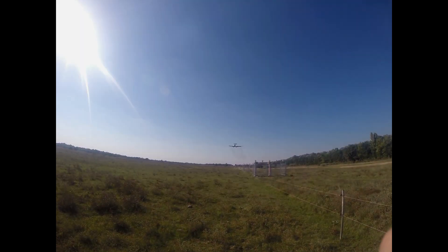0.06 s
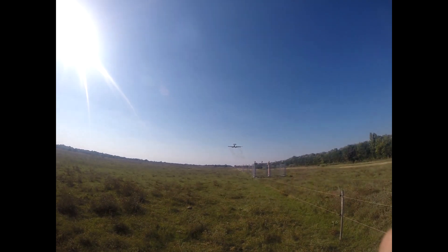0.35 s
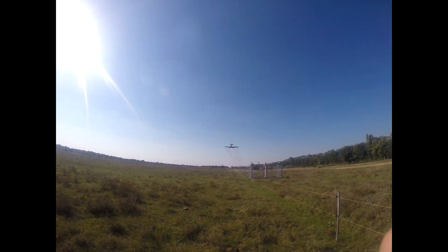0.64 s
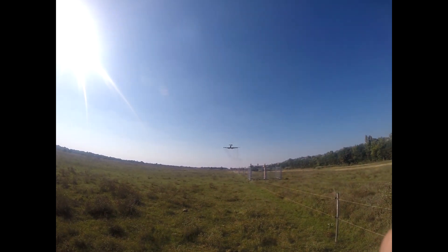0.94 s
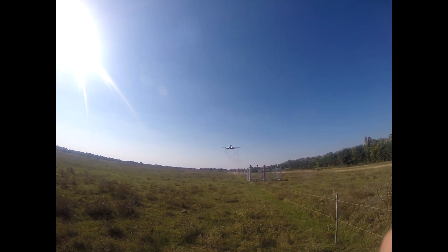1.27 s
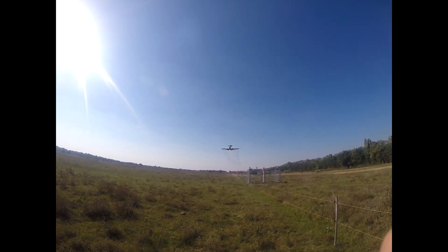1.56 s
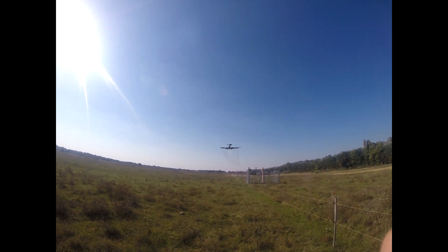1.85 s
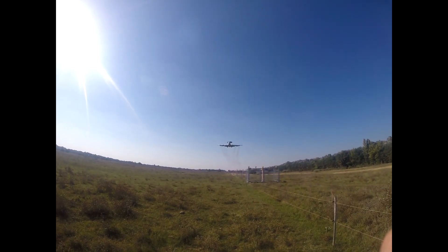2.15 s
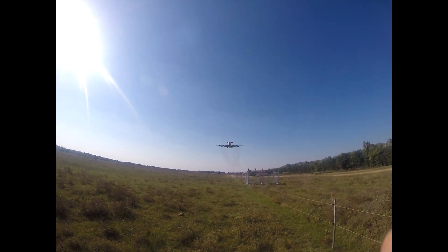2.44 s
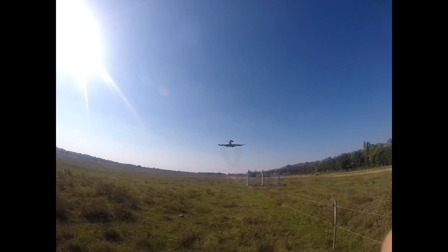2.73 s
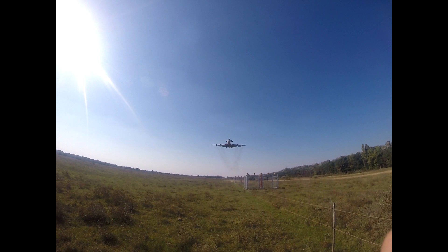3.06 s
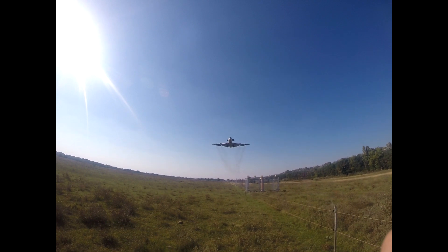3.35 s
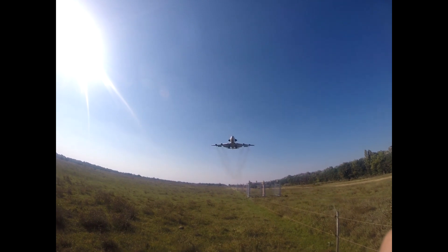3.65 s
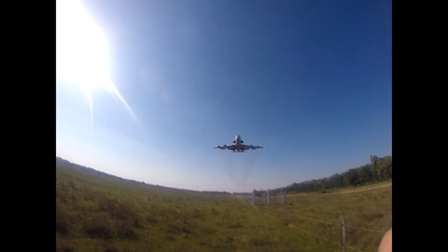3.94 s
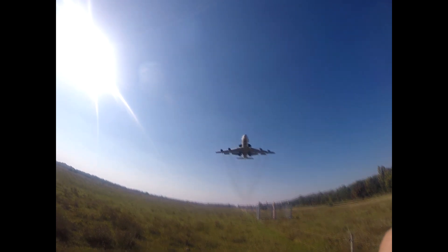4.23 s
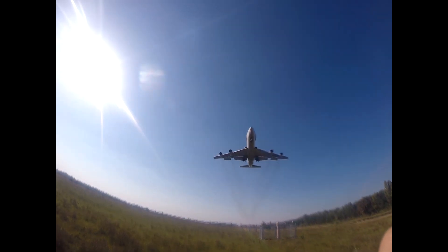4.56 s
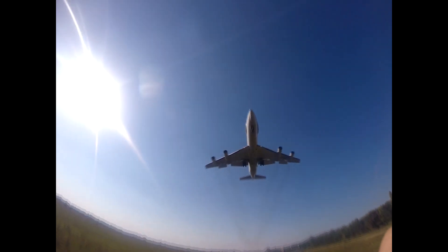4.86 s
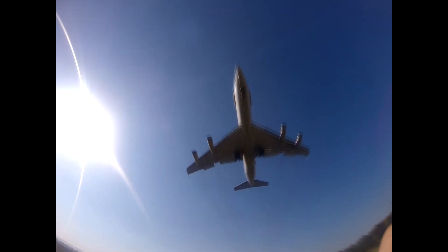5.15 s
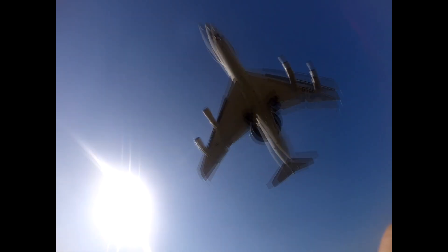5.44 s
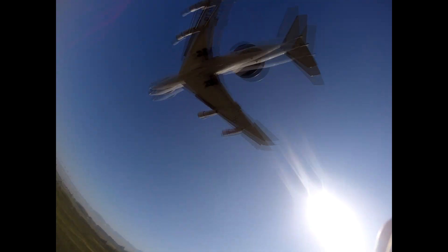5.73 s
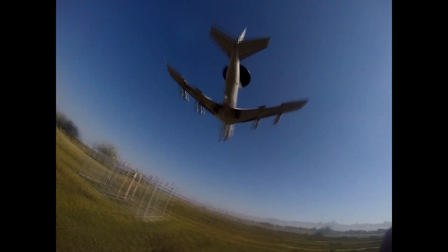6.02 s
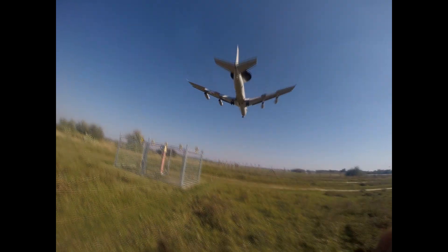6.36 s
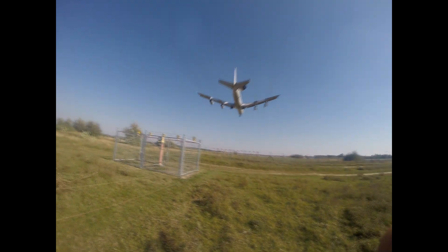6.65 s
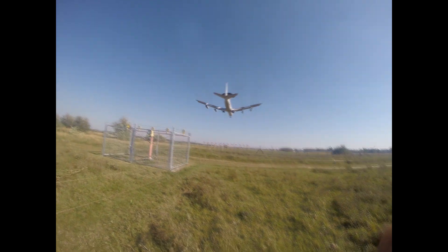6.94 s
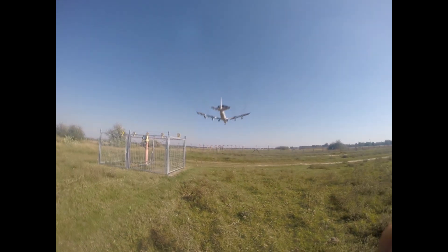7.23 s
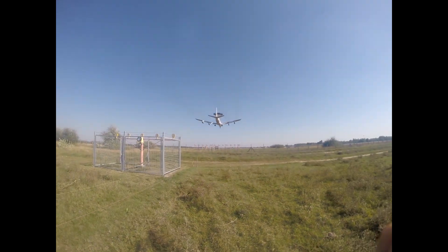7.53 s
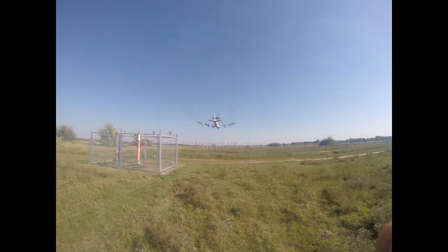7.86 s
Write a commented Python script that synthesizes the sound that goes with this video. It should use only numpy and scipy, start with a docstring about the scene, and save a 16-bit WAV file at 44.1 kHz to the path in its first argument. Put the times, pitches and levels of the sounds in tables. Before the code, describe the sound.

A large four-engined jet approaches low over an open grass field. For the first two seconds it is distant, a faint, dull rush with a thin high whine. From about 2.5 seconds a piercing fan whistle stands out, flaring unevenly between 3 and 5 seconds, while the rush grows louder and brighter. At about 5.5 seconds the jet passes directly overhead, the loudest moment: a broad, sweeping roar and hiss, with the whining tones sliding quickly down in pitch. A hand bumps the microphone with two dull thumps around 5.5 seconds, and two lighter knocks follow near 6.3 and 6.6 seconds. From 6 seconds to the end, near 8 seconds, the jet recedes: the hiss softens, and a lower turbine whine, exhaust roar and deep rumble carry on as it moves away.

```python
"""A four-engined jet on approach passes low over a hand-held camera in a grass field.
First come intake noise and fan whistles, beamed forward and dulled by air absorption while far away.
As the jet passes, the Doppler shift slides the tones down, interference with the ground echo sweeps the
roar, and the hand bumps the camera case, whose resonances colour everything. Last, the rear fan hiss,
turbine whine and exhaust roar recede over a faint background."""
import sys
import numpy as np
from scipy import signal
from scipy.fft import rfft, irfft, next_fast_len
from scipy.io import wavfile
from scipy.ndimage import uniform_filter1d

SR = 44100
rng = np.random.default_rng(int(sys.argv[2]) if len(sys.argv) > 2 else 0)


def transcribe(signal):
    """Save signal, clipped to [-1, 1], as a 16-bit WAV file at the path in sys.argv[1]."""
    frames = np.atleast_2d(signal).T
    limited = np.clip(frames, -1, 1)
    pcm = np.round(limited * 32767).astype(np.int16)
    wavfile.write(sys.argv[1], SR, pcm)


N = 347949
TIME = np.arange(N) / SR
SLOW_TIME = np.linspace(0, TIME[-1], 8192)
SPEED_M_S, HEIGHT_M, SOUND_M_S = 73.8, 30.2, 343  # a straight, level pass
MACH = SPEED_M_S / SOUND_M_S
OVERHEAD_S = 5.64  # the sound arrives from straight above


# intake spectrum: (frequency [Hz], level [dB])
INTAKE_SPECTRUM = [(500, -36.5), (1000, -15.5), (1300, -13.5), (1700, -6), (2600, -3.5), (3600, 0.5),
                   (5000, -10), (6200, -16.5), (8000, -24), (10000, -23.5), (11500, -54), (15000, -62)]
# directivity, as in every BEAMS table:
# (start [deg from nose], end [deg], level at start [dB], slope [dB/deg], opening steepness [exponent])
INTAKE_BEAMS = [(1.42, 94, -56, -0.34, 4.7), (160.4, 177, -79.5, 0.23, 7.2)]
def intake_noise():
    """Directivity: broadband intake noise radiates mainly forward, so it leads the jet."""
    rush = noise(lambda hz, t: spectrum(INTAKE_SPECTRUM, hz) + howl_db(hz, t)
                 + heard_db(INTAKE_BEAMS, hz, t))
    return rush * flutter(db=.76, rate_hz=8.7)


def howl_db(hz, t, near_hz=960, octave_m=438, width_hz=120):
    """A narrow spectral peak gives noise a hollow pitch; it sinks and grows as the jet nears."""
    distance, _ = flight(t)
    centre_hz = near_hz * 2 ** (distance / octave_m)
    height_db = 3 + 11.5 * np.exp(-distance / 67)
    return height_db * bell(hz, centre_hz, width_hz)


# exhaust spectrum: (frequency [Hz], level [dB])
EXHAUST_SPECTRUM = [(30, -16), (70, 0), (130, -6.5), (220, -2), (370, -6.5), (520, -15), (800, -14),
                    (1300, -3), (3000, -30)]
EXHAUST_BEAMS = [(1.5, 6, -86.5, 1, 6), (5.5, 97, -74, -0.1483, 5.5), (119, 177, -89, 0.1147, 7.9)]
def exhaust_roar():
    """Turbulence in the exhaust radiates a broad, low roar."""
    roar = noise(lambda hz, t: spectrum(EXHAUST_SPECTRUM, hz) + heard_db(EXHAUST_BEAMS, hz, t))
    return roar * flutter(db=1.53, rate_hz=16)


# rear fan spectrum at a blade tone of rest_hz: (frequency [Hz], level [dB])
REAR_FAN_SPECTRUM = [(700, -29.5), (1200, -19), (1700, -17.5), (2300, -18), (2600, -3), (2850, 0.5),
                     (3200, -9.5), (3700, -12.5), (4600, -13), (6000, -19.5), (8500, -22.5), (11000, -31),
                     (15000, -49.5)]
REAR_FAN_BEAMS = [(12.64, 71, -58.5, -0.36, 11), (60, 177, -75.5, 0.048, 6)]
def rear_fan_hiss(rest_hz=2800):
    """The Doppler shift moves noise too: the hump of this hiss follows the blade tone."""
    hiss = noise(lambda hz, t: spectrum(REAR_FAN_SPECTRUM, hz * rest_hz / blade_tone_hz(t))
                 + heard_db(REAR_FAN_BEAMS, hz, t))
    return hiss * flutter(db=1, rate_hz=22)


# partials, as in every TONES table: (frequency [x blade tone], relative level [dB], line width [Hz])
WHISTLE_TONES = [(1, 0, 5), (2, -21, 10), (3, -27, 14)]
# speed of the loudest fan against the others: (time [s], speed [ratio])
WHISTLE_SPEED = [(1.8, .921), (2.5, .986), (3.0, 1), (5.15, 1.002), (5.3, 1.015), (5.5, 1.021),
                 (5.75, 1.008)]
# flares and a dip of its whistle: (time [s], duration [s], level [dB])
WHISTLE_FLARES = [(3.1, 0.088, 9.5), (3.36, 0.16, 7.5), (3.85, 0.39, 6), (4.29, 0.25, 12.5),
                  (4.57, 0.31, 13.5), (4.8, 0.049, 9), (4.91, 0.081, -4), (5.06, 0.1, 5), (5.46, 0.11, 10)]
WHISTLE_BEAMS = [(5.2, 73.6, -30, -0.17, 8)]
def fan_whistle():
    """Periodic blade passage: the loudest fan beams a harmonic series forward."""
    blade_hz = blade_tone_hz(SLOW_TIME) * curve(WHISTLE_SPEED, SLOW_TIME)
    level_db = beamed_db(WHISTLE_BEAMS, SLOW_TIME) + swell_db(WHISTLE_FLARES, SLOW_TIME, order=4)
    return tones(WHISTLE_TONES, blade_hz, level_db, scatter=.22)


# partials and directivity of the intake (ahead), the duct (below) and the turbine (behind)
INTAKE_TONES = [(.312, 8, 9), (.398, 11, 6), (.586, 16, 7), (.85, 21, 6), (.912, 24, 5), (.968, 29, 5),
                (1.59, 9, 9), (1.7, 4, 9), (1.826, 13, 4), (1.885, 2, 6), (1.94, 4, 8), (2.055, 4, 5),
                (2.5, 1, 90), (2.916, -2, 8)]
INTAKE_TONE_BEAMS = [(6.7, 76, -57, -0.29, 4.4)]
DUCT_TONES = [(1, 0, 9), (1.02, -4, 9), (.893, -3, 10), (1.945, -10, 14), (2.02, -12, 14), (1.87, -10, 70),
              (3.0, -17, 260)]
DUCT_BEAMS = [(40, 138, -43, -0.083, 9), (139, 220, -55.5, 0.032, 9)]
TURBINE_TONES = [(.402, 1.2, 3.8), (.6, 5, 100), (1.68, 1, 25), (1.84, 18.2, 250)]
TURBINE_BEAMS = [(144.3, 177, -70.5, 0.35, 4.4)]
def engine_whine():
    """Rotor tones keep constant ratios to the blade tone; directivity brings each group in turn."""
    blade_hz = blade_tone_hz(SLOW_TIME)
    intake = tones(INTAKE_TONES, blade_hz, beamed_db(INTAKE_TONE_BEAMS, SLOW_TIME), scatter=.4)
    duct = tones(DUCT_TONES, blade_hz, beamed_db(DUCT_BEAMS, SLOW_TIME), scatter=.3)
    turbine = tones(TURBINE_TONES, blade_hz, beamed_db(TURBINE_BEAMS, SLOW_TIME), scatter=.35)
    return intake + duct + turbine


PLUME_BEAMS = [(159.4, 177, -72, -.35, 9.4)]
def plume_rumble(corner_hz=90):
    """Directivity: the plumes beam their deep rumble backward, so it comes once the jet has gone by."""
    return noise(lambda hz, t: beamed_db(PLUME_BEAMS, t) - 10 * np.log10(1 + (hz / corner_hz) ** 4))


# blade tone pitch, lifting slightly just before overhead: (time [s], frequency before Doppler [Hz])
BLADE_PITCH = [(2.5, 2743), (4.7, 2725), (5.15, 2791), (7.89, 2753)]
def blade_tone_hz(t):
    """Doppler effect: the blade tone is raised on approach and lowered in retreat."""
    _, angle = flight(t)
    return curve(BLADE_PITCH, t) / (1 - MACH * np.cos(angle))


def flight(t):
    """Retarded time: distance [m] and angle from the nose [rad] at which the sound heard at t left."""
    along = SPEED_M_S * (t - OVERHEAD_S) + MACH * HEIGHT_M
    contraction = 1 - MACH ** 2
    distance = (np.sqrt(along ** 2 + contraction * HEIGHT_M ** 2) - MACH * along) / contraction
    return distance, np.arccos(MACH - along / distance)


def beamed_db(beams, t, reference_m=100, closing=12):
    """Beams add in power as they sweep over the listener and fall off by spherical spreading."""
    distance, angle = flight(t)
    power = 0
    for start, end, db, slope, opening in beams:
        opens, closes = (np.tan(np.radians(np.clip(edge, 1, 179)) / 2) / np.tan(angle / 2)
                         for edge in (start, end))
        inside = 1 / ((1 + opens ** opening) * (1 + closes ** -closing))
        power = power + (inside * undb(db + slope * (np.degrees(angle) - start))) ** 2
    return 10 * np.log10(power) - 20 * np.log10(distance / reference_m)


def air_loss_db(hz, t, db_per_m=.1478, reference_m=38.4):
    """Atmospheric absorption grows with frequency and with the path beyond the reference distance."""
    distance, _ = flight(t)
    return db_per_m * (distance - reference_m) * (hz / 10000) ** 1.56


# swells and sags of the engine noise: (time [s], duration [s], level at swell_hz [dB])
SWELLS = [(.3, 0.51, 1.5), (1.15, 0.47, 1.5), (1.7, 0.83, -2.5), (2.75, 0.26, -1), (3.1, 0.37, 3),
          (3.88, 0.67, 4), (4.16, 0.39, -1.5), (4.31, 0.17, 2.5), (5.55, 0.28, 5.5), (5.78, 0.15, 0.5),
          (6.02, 0.27, 3), (7.15, 0.73, 2.5)]
def heard_db(beams, hz, t, swell_hz=2520):
    """Gains along a path add in decibels: beams, swells and patches, less the air's absorption."""
    swells = swell_db(SWELLS, t, order=2) * (hz / swell_hz) ** .24  # deeper in the treble
    return beamed_db(beams, t) + swells + patches_db(hz, t) - air_loss_db(hz, t)


def tones(lines, blade_hz, level_db, scatter):
    """Spectral broadening: each tone is a steady part plus a part scattered by turbulence."""
    turns = np.cumsum(audio_rate(blade_hz)) / SR
    total = 0
    for multiple, db, width in lines:
        share = scatter * np.sqrt(width / 10)  # the wider a line, the less of it stays steady
        field = (1 + share * (walk(width) + 1j * walk(width))) / np.sqrt(.5 + share ** 2)
        amplitude = np.abs(field) * undb(level_db + db - air_loss_db(multiple * blade_hz, SLOW_TIME))
        drift = audio_rate(np.unwrap(np.angle(field)))
        total = total + audio_rate(amplitude) * np.cos(2 * np.pi * multiple * turns + drift)
    return total


def flutter(db, rate_hz):
    """Scintillation: the gain wavers as the sound crosses uneven air."""
    return audio_rate(undb(db * walk(rate_hz)))


def patches_db(hz, t, depth_db=1.5, length_s=.29, width_hz=220):
    """Selective fading: uneven air lets narrow bands swell and fade on their own."""
    field = rng.standard_normal((len(hz), len(t)))
    for _ in range(2):
        field = uniform_filter1d(field, max(1, int(width_hz / hz[1, 0])), axis=0)
        field = uniform_filter1d(field, max(1, int(length_s / t[1])), axis=1)
    return depth_db * field / field.std()


def ground_echo(x, db=-4.5, soft_hz=900, give_rad=.83, overhead_lag_s=.0081):
    """Comb interference: soft ground returns the lows, latest overhead, so the notches sink and rise."""
    returned = filtered(x, lambda hz: undb(db) * np.exp(-hz / soft_hz
                                                        - 1j * give_rad * np.sqrt(hz / soft_hz)))
    _, angle = flight(TIME)
    lag = overhead_lag_s * np.sin(angle) ** .703
    return np.interp(TIME - lag, TIME, returned)


# pushes of the hand: (time [s], level [dB], contact time [s])
BUMPS = [(5.428, -24.5, 0.0029), (5.545, -28.5, 0.0013), (6.33, -38, 0.0007), (6.582, -36, 0.00073)]
# modes of the case: (frequency [Hz], level [dB], 60 dB decay time [s])
CASE_MODES = [(74.5, -9, 0.028), (208, -1.5, 0.04), (426, -1, 0.057), (840, -19, 0.014)]
def hand_bumps():
    """Impact excitation: half-sine pushes ring the case's modes; longer contact gives a duller thump."""
    t = TIME[:SR // 10]
    ring = sum(undb(db) * np.sin(2 * np.pi * hz * t) * np.exp(-np.log(1000) * t / t60)
               for hz, db, t60 in CASE_MODES)
    force = 0
    for onset, db, contact in BUMPS:
        push = np.sin(np.pi * np.clip((TIME - onset) / contact, 0, 1))
        force = force + undb(db) * push / push.sum()
    return signal.fftconvolve(force, ring)[:N]


# slips of the grip: (time [s], level [dB], decay time [s])
GRIP_SLIPS = [(6.904, -74, .004), (6.918, -69, .01), (7.113, -89, .002), (7.383, -80, 0.0022)]
def grip_ticks():
    """Friction: each slip of the grip is a faint, decaying burst of high noise."""
    envelope = sum(undb(db) * np.exp(-np.abs(TIME - onset) / decay) * (TIME >= onset)
                   for onset, db, decay in GRIP_SLIPS)
    return filtered(envelope * rng.standard_normal(N), lambda hz: bell(hz, 12500, width_hz=2800))


# peaks and notches of the camera case: (frequency [Hz], width [Hz], gain [dB])
CASE_RESPONSE = [(1740, 40, 2), (2036, 79, -9.5), (2910, 360, 5), (3149, 171.6, -16), (4140, 635, -10),
                 (4947, 253, 9.5), (1064, 107, -10.5), (1464, 113, -2.5), (6220, 230, -2), (8720, 340, 2.5),
                 (6850, 240, -2), (7170, 67, 6)]
def case_gain(hz):
    """Resonance and antiresonance: the case lifts some bands and cuts others."""
    return undb(sum(db * bell(hz, centre, width) for centre, width, db in CASE_RESPONSE))


# background spectrum: (frequency [Hz], level per Hz [dB])
BACKGROUND_SPECTRUM = [(30, -91), (80, -88), (200, -94), (500, -104), (1500, -113), (6000, -124),
                       (10000, -129), (15000, -132)]
def background():
    """Stationary noise: a faint, steady rumble and hiss."""
    return noise(lambda hz, t: spectrum(BACKGROUND_SPECTRUM, hz))


def noise(density_db, size=1024):
    """Spectral shaping: white noise takes the level per Hz given by density_db(Hz, s)."""
    hz, t, white = signal.stft(rng.standard_normal(N) * np.sqrt(SR / 2), SR, nperseg=size)
    return signal.istft(white * undb(density_db(hz[:, None], t)), SR, nperseg=size)[1][:N]


def walk(rate_hz):
    """Low-passed noise: smooth random motion of unit spread on SLOW_TIME."""
    hz = np.fft.rfftfreq(len(SLOW_TIME), SLOW_TIME[1])
    motion = irfft(rfft(rng.standard_normal(len(SLOW_TIME))) * bell(hz, 0, rate_hz))
    return motion / motion.std()


def filtered(x, gain):
    """Linear filtering: the spectrum of x is multiplied by gain(Hz)."""
    size = next_fast_len(N + SR // 4)
    return irfft(rfft(x, size) * gain(np.fft.rfftfreq(size, 1 / SR)), size)[:N]


def swell_db(rows, t, order):
    """Amplitude modulation by rounded rises and dips; a higher order gives flatter tops."""
    return sum(db * np.exp(-np.abs(2 * (t - centre) / length) ** order) for centre, length, db in rows)


def spectrum(points, hz):
    """Interpolation of level [dB] on a log-frequency axis."""
    at, db = np.transpose(points)
    return np.interp(np.log(np.maximum(hz, 1)), np.log(at), db)


def curve(rows, t):
    """Linear interpolation of a time table."""
    return np.interp(t, *np.transpose(rows))


def audio_rate(slow):
    """Linear interpolation from SLOW_TIME to TIME."""
    return np.interp(TIME, SLOW_TIME, slow)


def bell(hz, centre_hz, width_hz):
    """Gaussian band of unit height."""
    return np.exp(-.5 * ((hz - centre_hz) / width_hz) ** 2)


def undb(db):
    """Decibels to gain."""
    return 10 ** (np.asarray(db) / 20)


def scene():
    """Superposition of the jet, its echo off the grass and the hand on the camera."""
    jet = exhaust_roar() + intake_noise() + rear_fan_hiss() + fan_whistle() + engine_whine()
    return (jet + ground_echo(jet) + plume_rumble() + hand_bumps() + grip_ticks())[None]


def record(dry):
    """Filters in series: the case colours the sound, the background joins, and a low-pass cuts the top."""
    cased = filtered(dry[0], case_gain)
    low_pass = signal.ellip(10, .2, 70, 15200, fs=SR, output="sos")
    return signal.sosfilt(low_pass, cased + background())[None]


dry = scene()
out = record(dry)
transcribe(out)
```